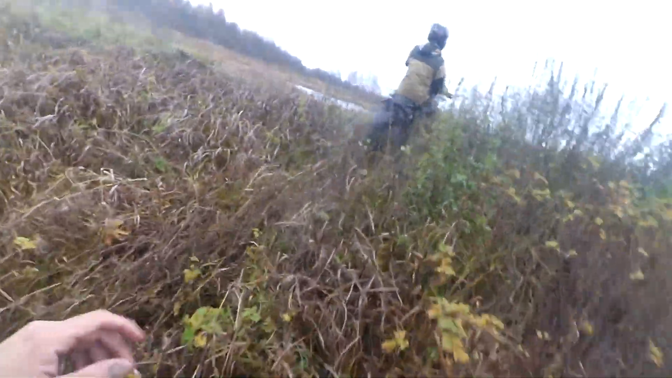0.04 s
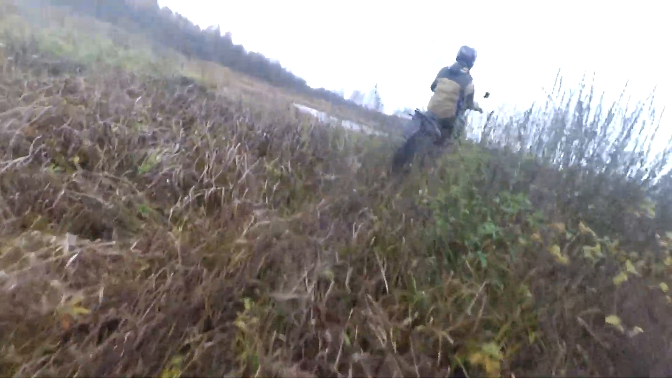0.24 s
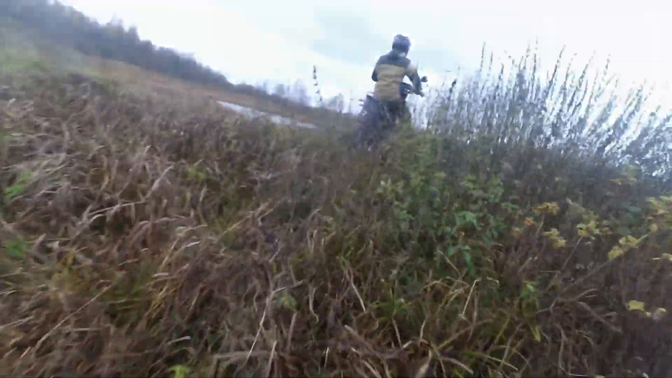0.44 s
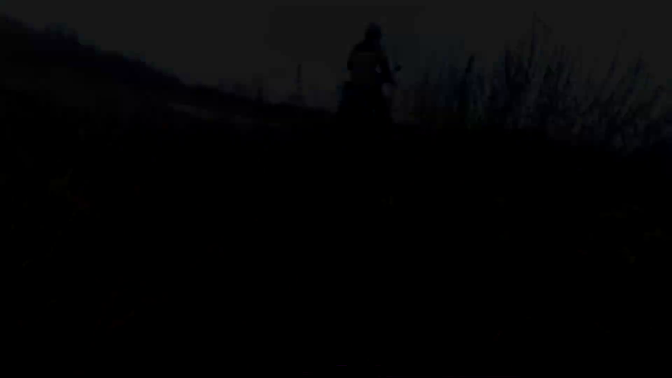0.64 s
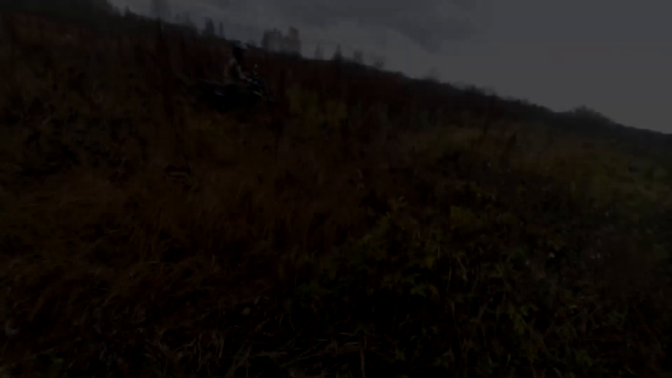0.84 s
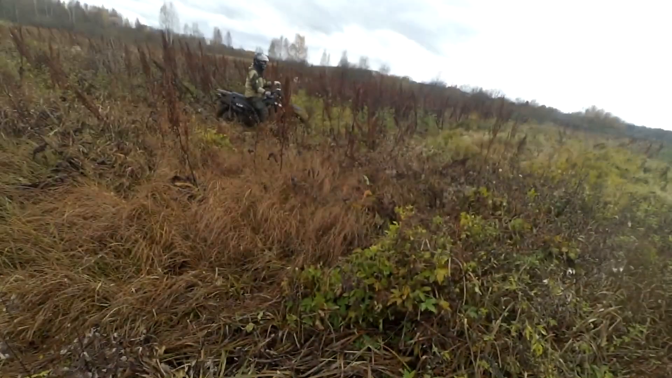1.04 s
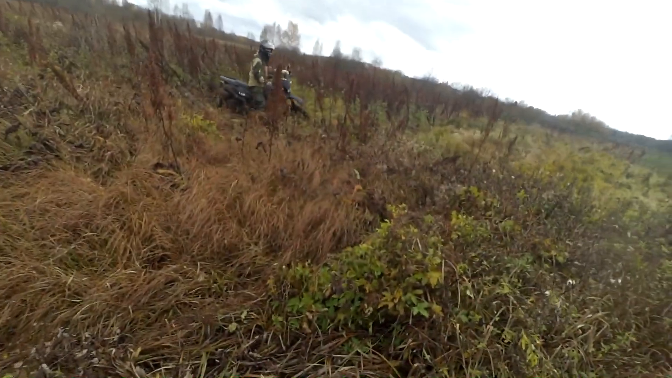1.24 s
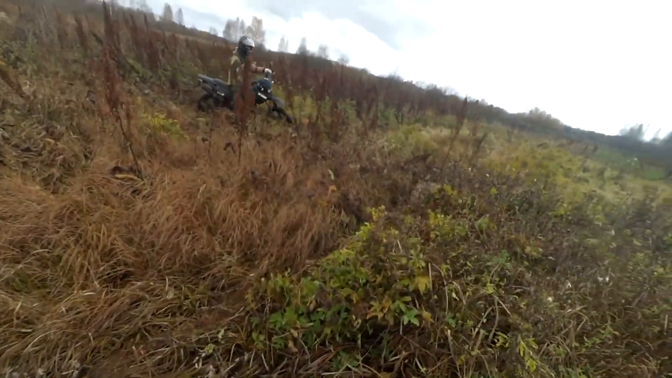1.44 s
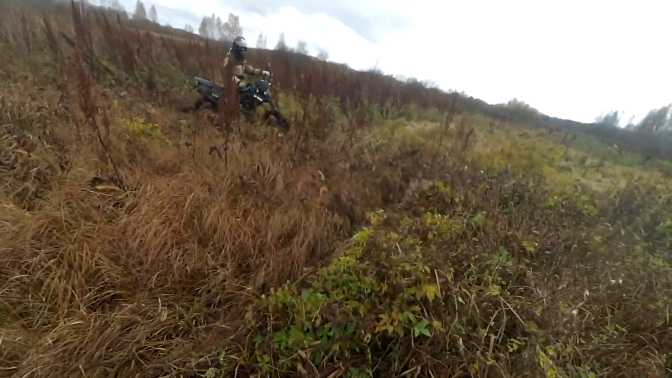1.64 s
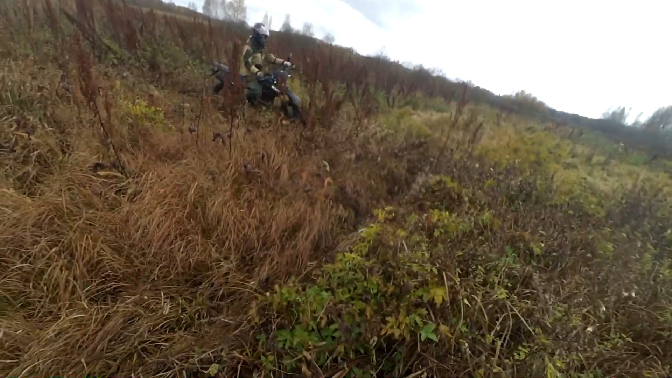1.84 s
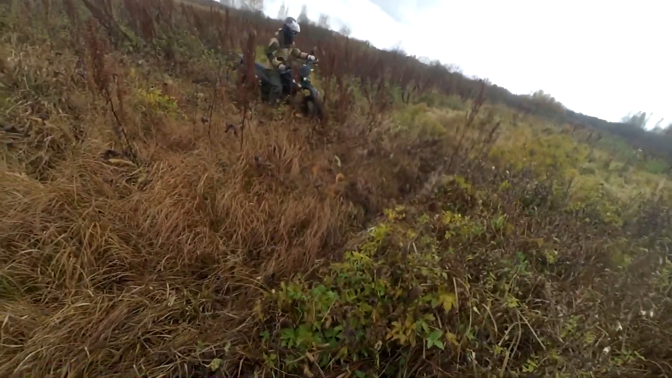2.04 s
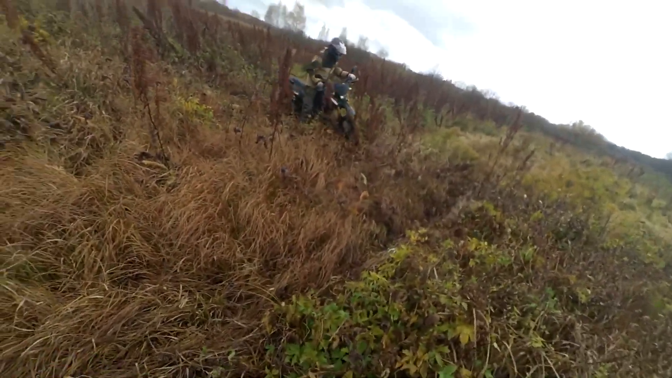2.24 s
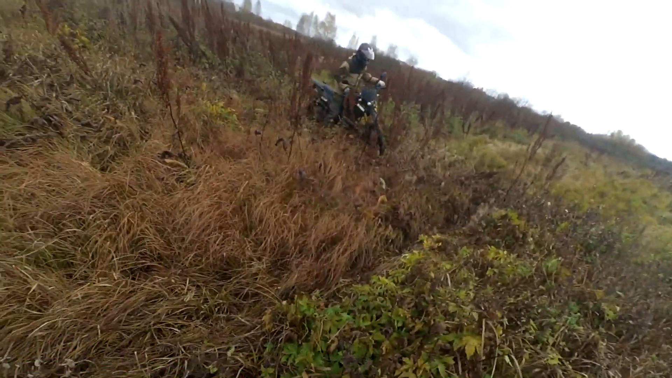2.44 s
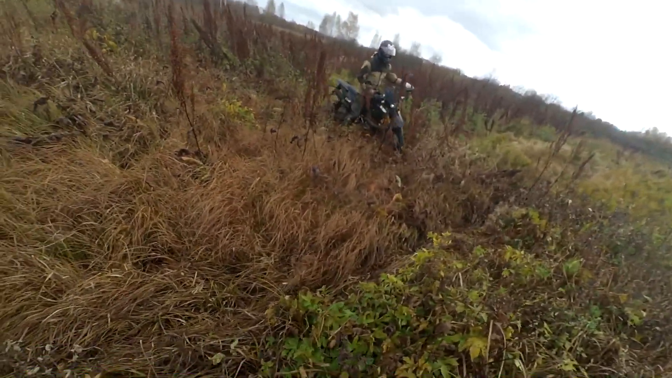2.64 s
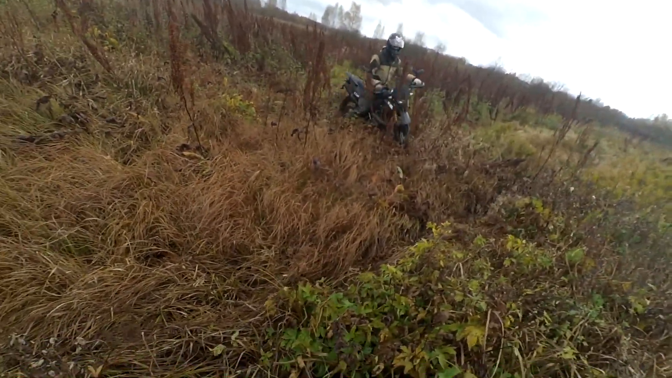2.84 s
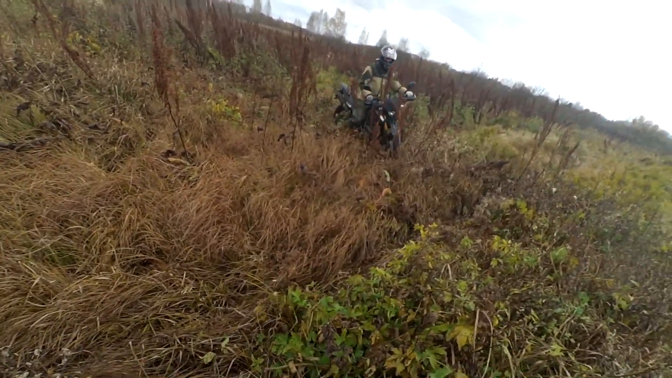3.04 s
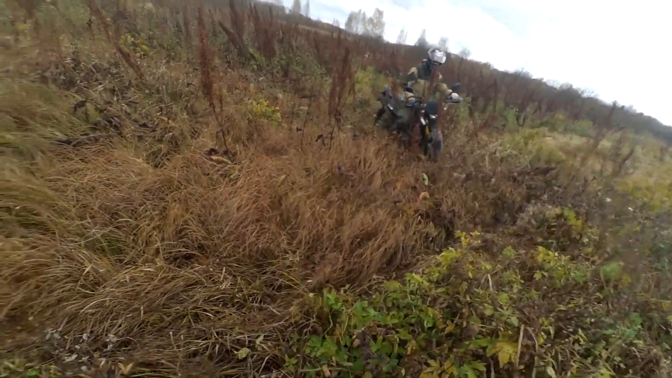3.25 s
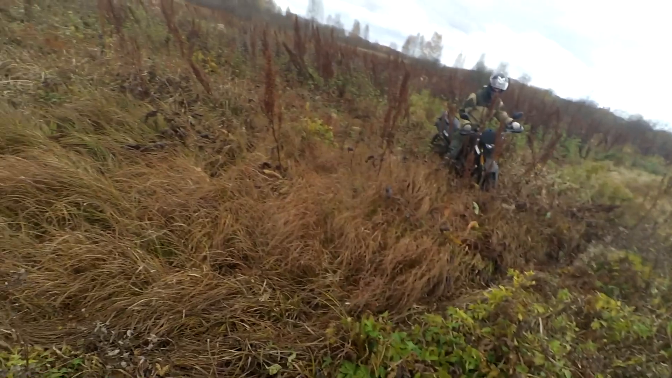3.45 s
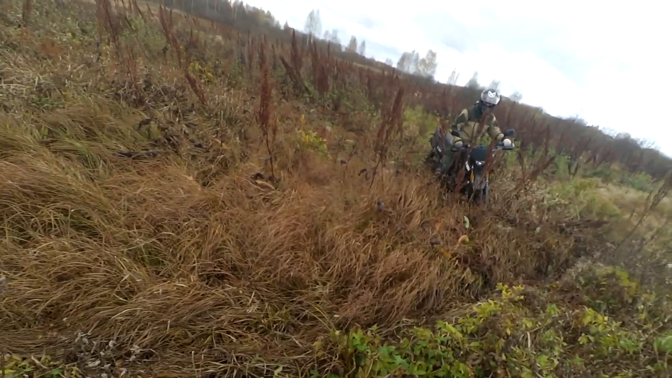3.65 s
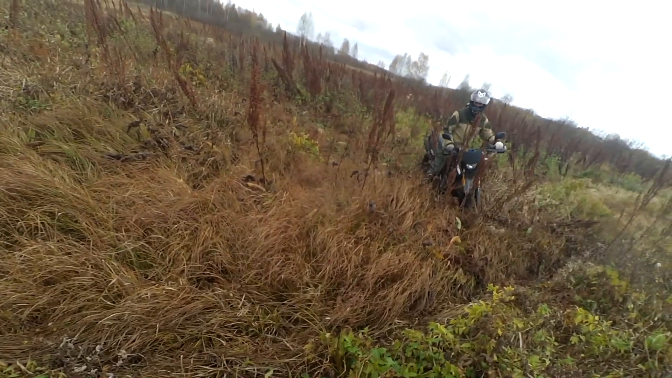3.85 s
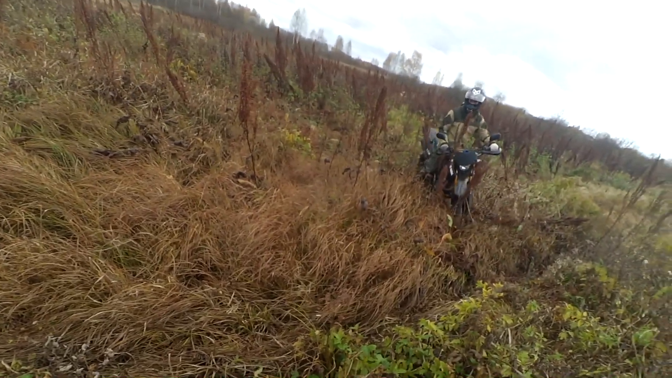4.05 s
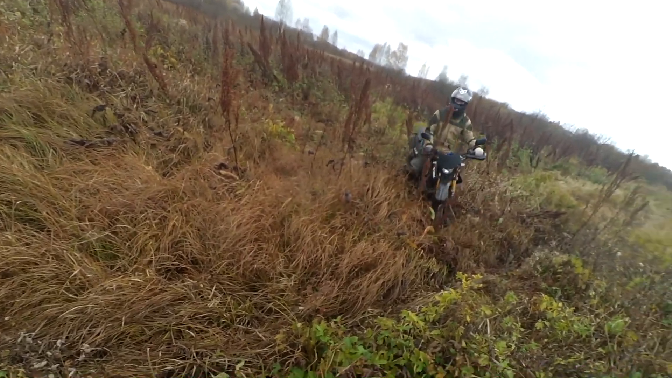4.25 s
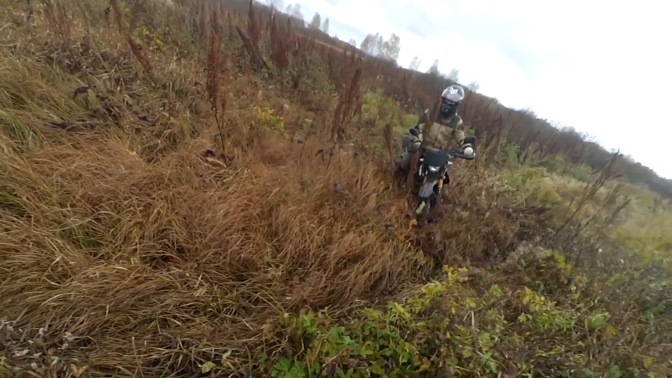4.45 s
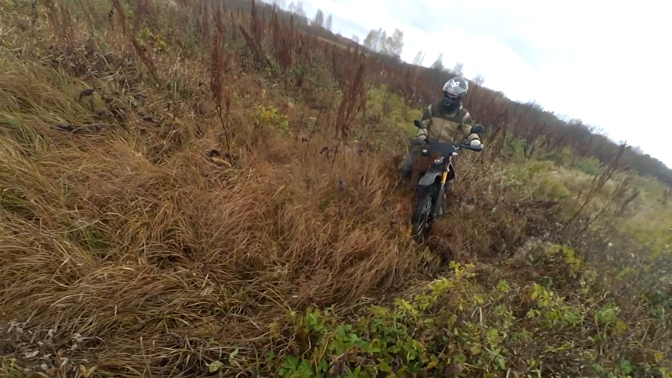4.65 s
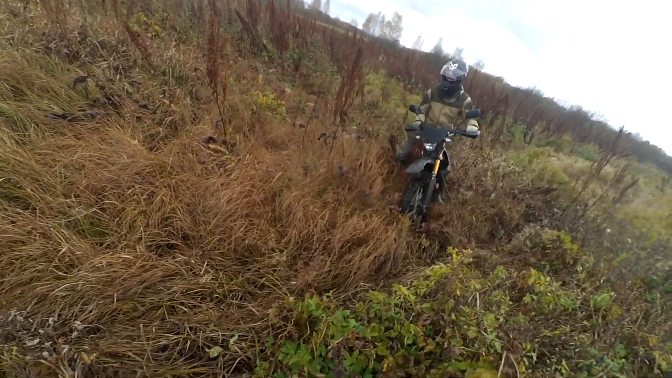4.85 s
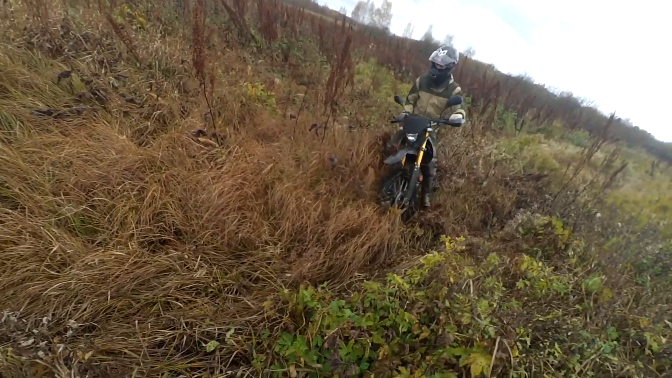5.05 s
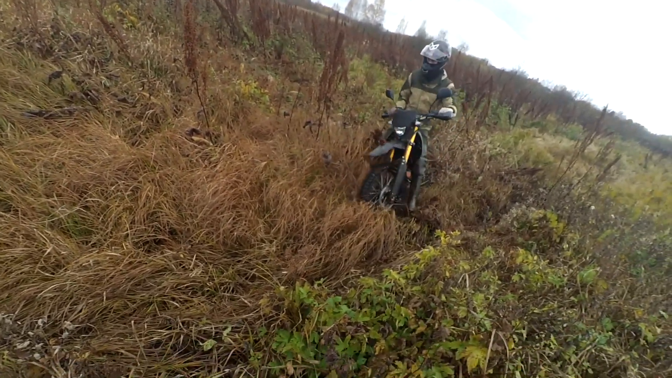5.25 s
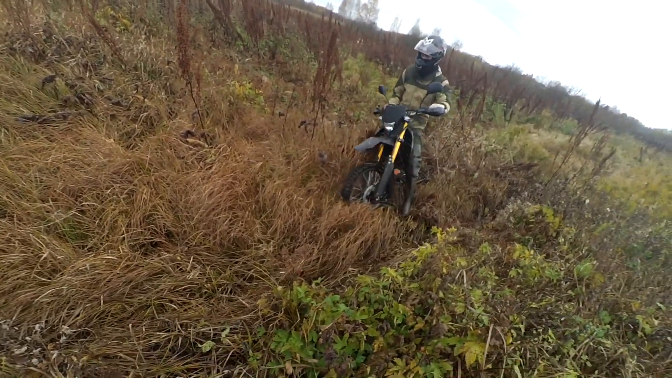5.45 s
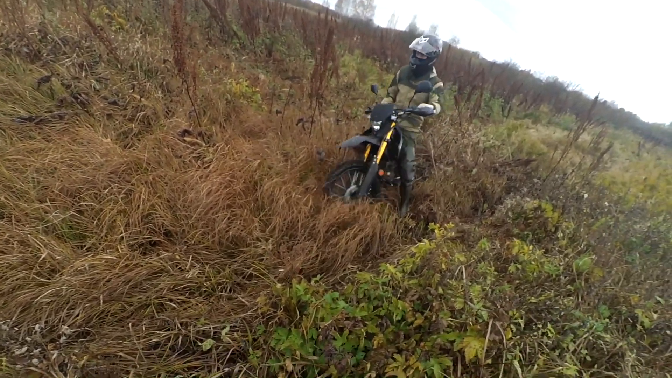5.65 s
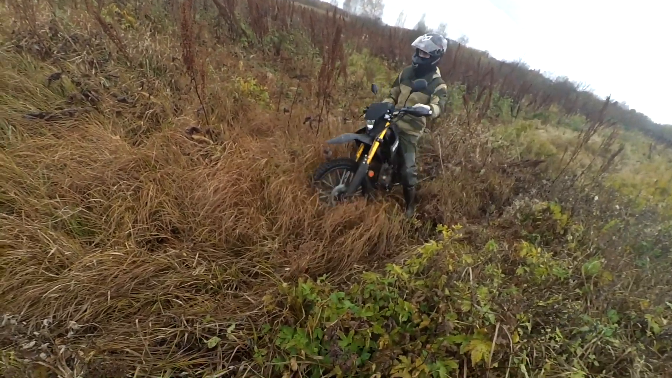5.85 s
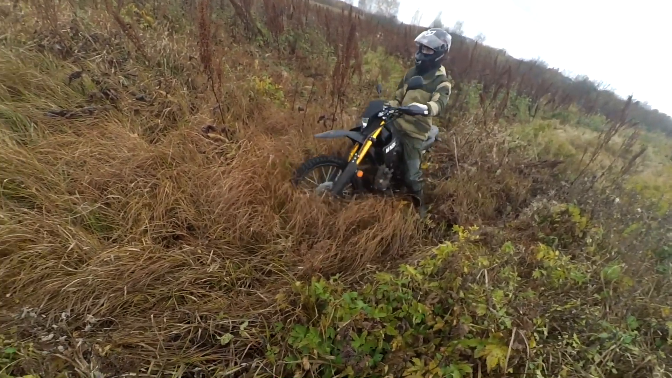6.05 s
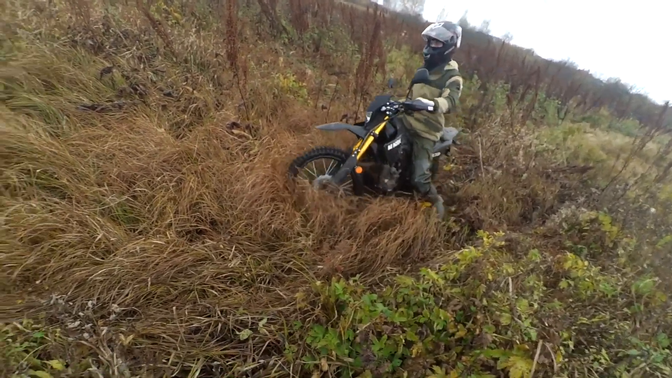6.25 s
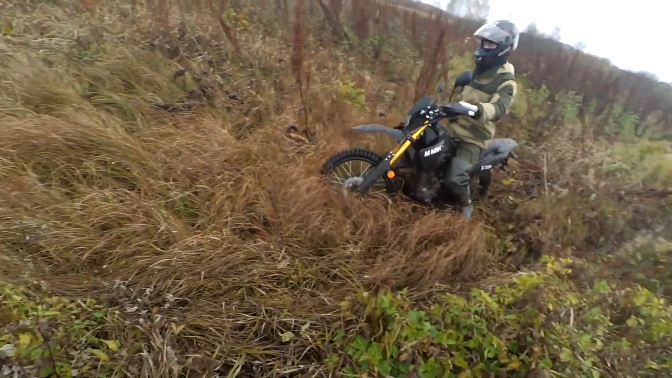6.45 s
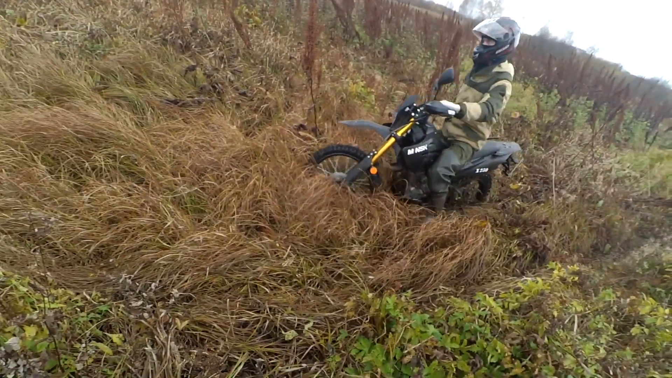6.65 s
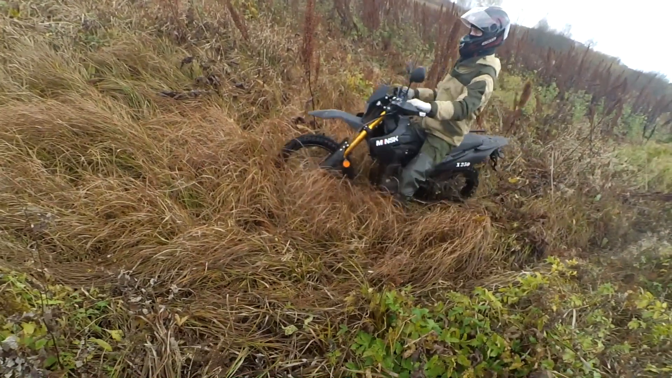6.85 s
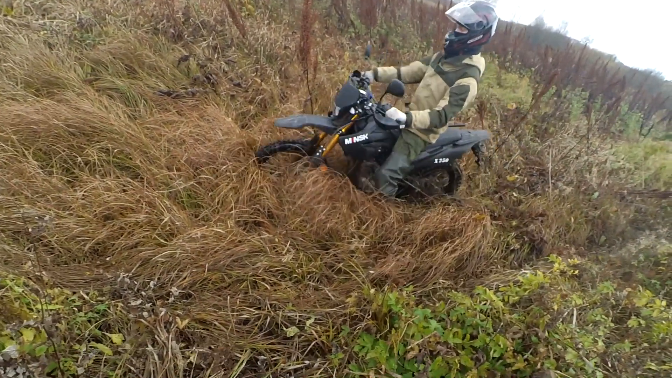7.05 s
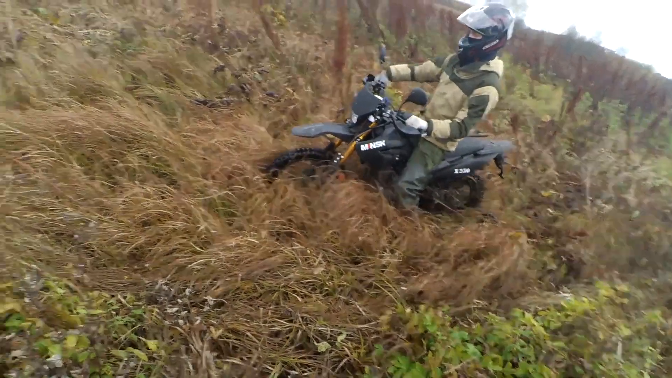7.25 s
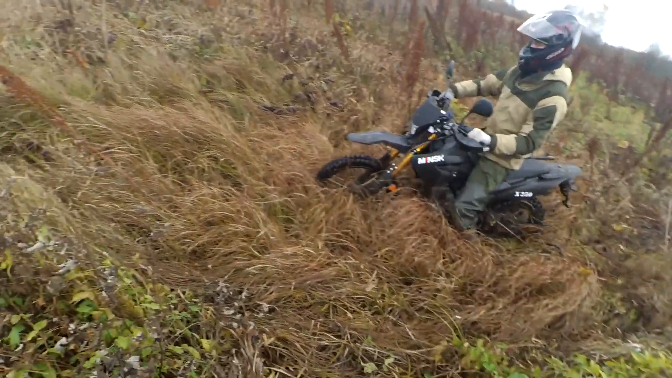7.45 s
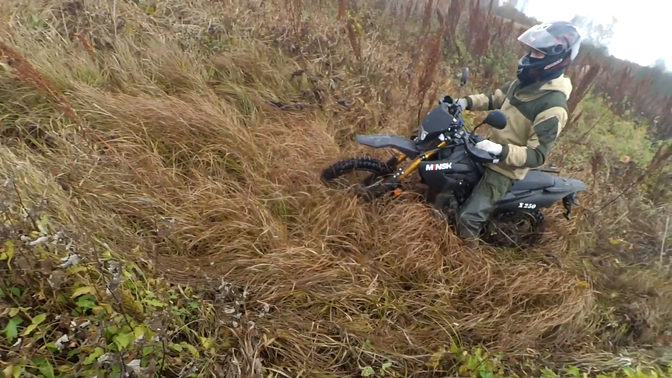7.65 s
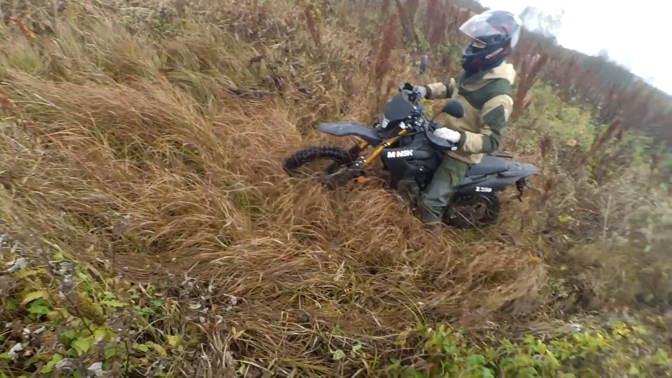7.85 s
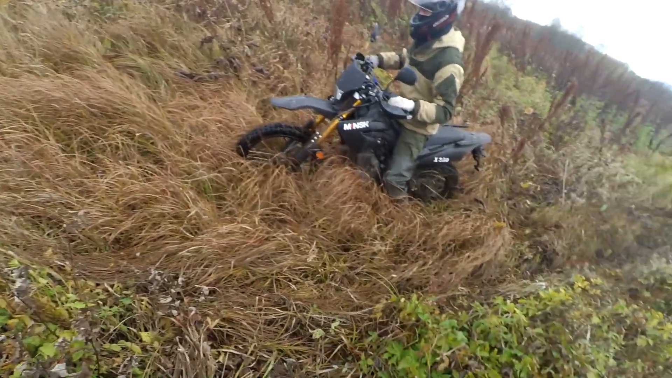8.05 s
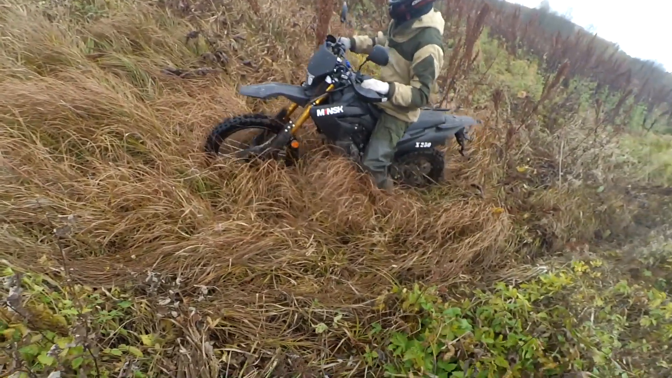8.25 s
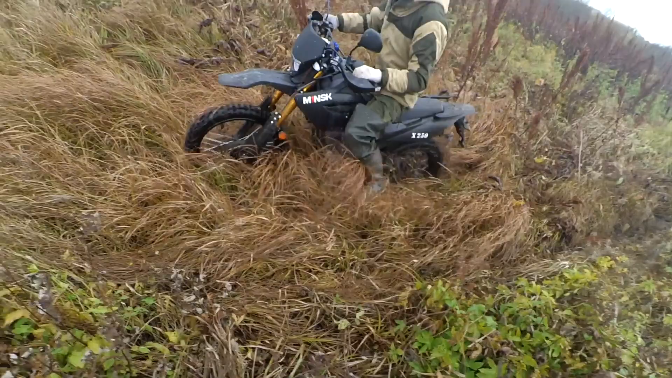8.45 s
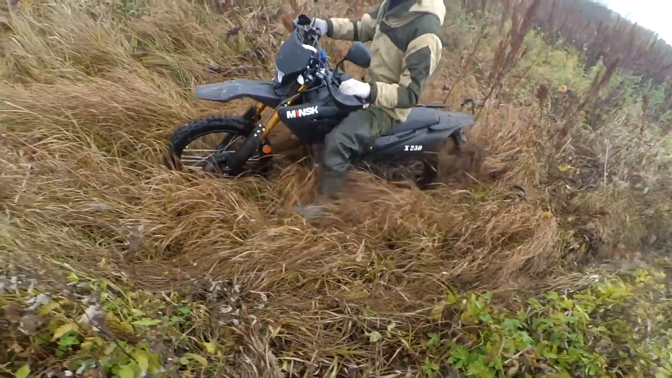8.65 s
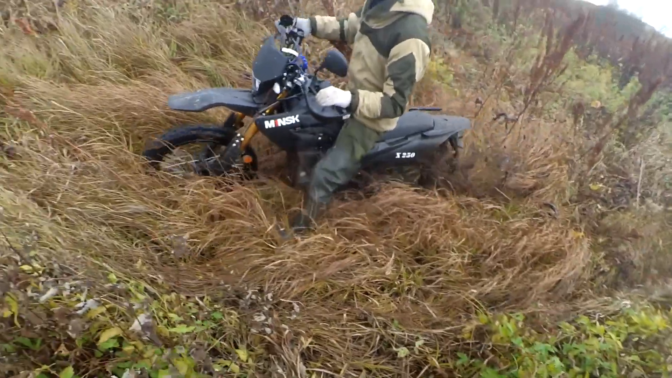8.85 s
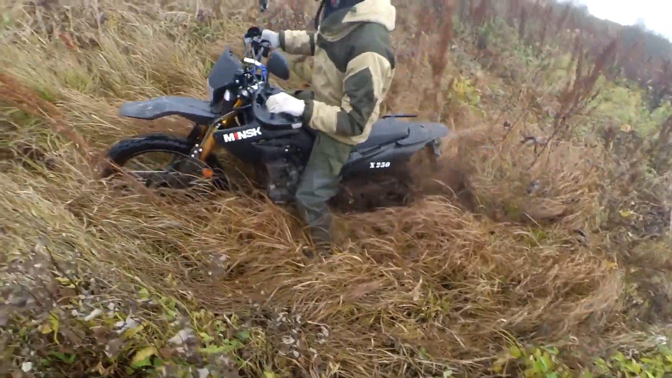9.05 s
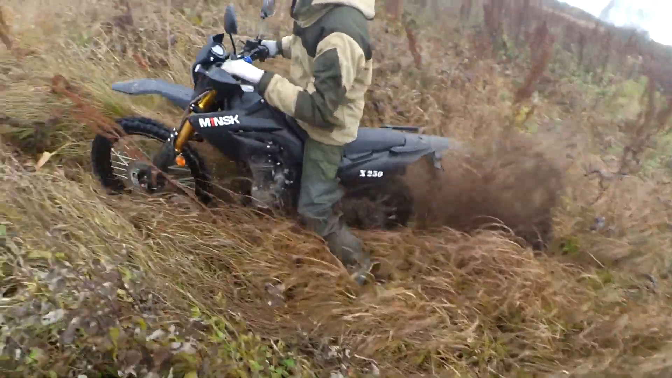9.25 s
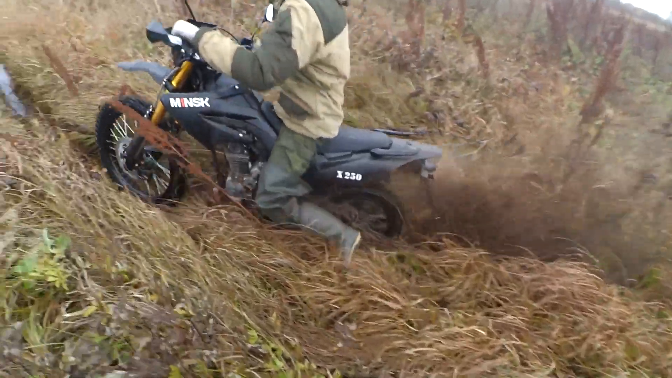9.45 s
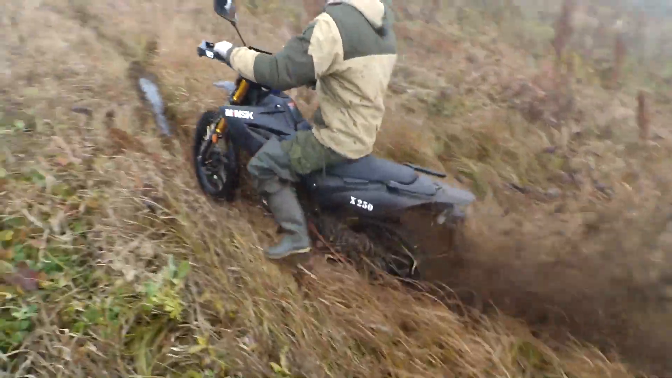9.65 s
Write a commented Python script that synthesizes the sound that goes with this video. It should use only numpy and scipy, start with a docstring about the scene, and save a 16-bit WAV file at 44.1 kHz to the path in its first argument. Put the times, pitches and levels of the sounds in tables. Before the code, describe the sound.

A single-cylinder four-stroke dirt bike rides through wet, hissing grass outdoors, with low wind rumble on the microphone. In the first second it pulls away, accompanied by a few dull knocks. From about 1 second it is quieter and farther off, putting at low revs that rise and fall with the throttle. The engine sags almost to idle around 3 seconds, picks up near 3.7 and sags again around 5.3. Short clusters of exhaust pops come near 2.8, 4.8 and 7 seconds as the throttle shuts. Stalks snap near the microphone, most clearly around 2.6, between 4.3 and 4.8, and at 7 seconds. Wind gusts return from about 6 seconds. At 7.7 seconds the engine revs up sharply and grows louder, with ringing metal and valve clatter. It is close and loudest from 9 seconds to the end near 9.7, with strong grass hiss.

```python
"""A single-cylinder four-stroke dirt bike rides off through wet, hissing grass; wind rumbles on the
microphone and a few dull knocks sound. Each firing drives the resonances of the exhaust pipe and the
engine's metal. While the bike is far off, stalks snap near the microphone, and near 2.8, 4.8 and 7 s
the throttle shuts and unburnt gas pops in the pipe. From 7.7 s it revs up and is at last close by."""
import sys
import numpy as np
from scipy import signal
from scipy.io import wavfile
from scipy.ndimage import uniform_filter1d

SR = 44100
rng = np.random.default_rng(int(sys.argv[2]) if len(sys.argv) > 2 else 0)


def transcribe(signal):
    """Save signal, clipped to [-1, 1], as a 16-bit WAV file at the path in sys.argv[1]."""
    frames = np.atleast_2d(signal).T
    limited = np.clip(frames, -1, 1)
    pcm = np.round(limited * 32767).astype(np.int16)
    wavfile.write(sys.argv[1], SR, pcm)


N = 427769
FIRING_PHASE = .56   # share of the cycle at which a firing strikes

# exhaust pipe resonances: (frequency [Hz], bandwidth [Hz], gain [dB])
PIPE_MODES = [(100, 68.6, 2.5), (206, 94, -0.5), (247.7, 54.3, 0.5), (369.5, 26, -5), (424.3, 49.4, -5.5)]
# throttle and distance: (time [s], exhaust level [dB], throttle shut [0-1], upper harmonics' gain [dB])
RIDE = [(0, -23.5, 0.14, 8.5), (0.15, -25, 0.16, 1), (0.33, -35.5, 0.02, 19), (0.4, -23, 0.81, -3.5),
        (0.8, -30.5, 0.36, -4.5), (1.1, -34, 0.9, 2), (1.3, -33, 0.59, 2), (1.7, -32, 0.49, -2),
        (1.85, -36.5, 1, 2), (2.1, -32.5, 0.42, -2.4), (2.4, -32.5, 0.56, -2.5), (2.72, -33.1, 0.32, -3.5),
        (2.8, -35, 1.0, -3.5), (3.05, -35.7, 0.97, 6), (3.35, -35, 0.82, 0.8), (3.5, -31.5, 0.27, 3),
        (3.8, -27.1, 0.54, -6), (4.1, -32, 0.1, -1.4), (4.7, -30.5, 0.19, 0.5), (4.82, -34.5, 0.83, 1.8),
        (5.25, -32.5, 0.6, 4.5), (5.6, -34, 0.37, 5.5), (6.1, -32.5, 0.1, 4.5), (6.5, -30, 0.45, 2.5),
        (6.97, -29.5, 0.55, 5), (7.07, -36, 0.9, 5.5), (7.3, -31.6, 0.97, -3.5), (7.6, -31.5, 0.58, 2),
        (7.7, -22.5, 0, 3.5), (7.76, -22, 0.1, 2.5), (7.8, -22.5, 0.73, -10.5), (7.88, -25, 0.66, -6),
        (7.92, -24.5, 0.25, 0), (8.3, -23, 0.35, 2.1), (8.55, -22.5, 0.12, 0.1), (8.9, -18.5, 0.49, 2),
        (8.98, -18.5, 0.44, 0), (9.03, -19, 0.59, -6.5), (9.2, -19.0, 0.42, 4.5), (9.38, -20.5, 0.29, 6),
        (9.5, -20, 0.46, 2.5), (9.7, -15.5, 0.4, 5.0)]
# wind on the microphone: (time [s], level [dB])
WIND_LEVELS = [(0, -24), (.8, -30), (.82, -43), (1.2, -43), (2.4, -39), (4.7, -35), (5.55, -51), (6, -31.5),
               (7, -28), (7.55, -31), (7.75, -41), (8.2, -30), (9, -24), (9.6, -31)]


def amp(db):
    """Amplitude ratio of a level in decibels."""
    return 10 ** (np.asarray(db) / 20)


def unit_rms(x):
    """Normalisation to an rms of 1."""
    return x / np.sqrt(np.mean(x ** 2) + 1e-20)


def curves(rows):
    """Linear interpolation of each column over time, sample by sample."""
    times, *columns = np.transpose(rows)
    return [np.interp(np.arange(N) / SR, times, column) for column in columns]


def drift(rate_hz):
    """Slow random modulation: low-passed noise of unit rms."""
    hop = 40
    pole = np.exp(-2 * np.pi * hop * rate_hz / SR)
    slow = signal.lfilter([1], [1, -2 * pole, pole ** 2], rng.standard_normal(N // hop + 2002))[2000:]
    return np.interp(np.arange(N) / hop, np.arange(len(slow)), unit_rms(slow))


def resonate(x, modes):
    """Superposition of damped modes (frequency [Hz], bandwidth [Hz], gain [dB]), alternating in sign."""
    out = 0
    for k, (hz, width, db) in enumerate(modes):
        r = np.exp(-np.pi * width / SR)
        b = (1 - r * r) / 2 * np.array([1, 0, -1])
        a = [1, -2 * r * np.cos(2 * np.pi * hz / SR), r * r]
        out = out + (-1) ** k * amp(db) * signal.lfilter(b, a, x + 1e-18)
    return out


def band(x, low_hz, high_hz, order=2):
    """Butterworth band-pass filtering."""
    return signal.sosfilt(signal.butter(order, [low_hz, high_hz], "band", fs=SR, output="sos"), x)


def puff(cycles, decay, floor):
    """Exponential decay above a floor, restarted each cycle; the time constant is in cycles."""
    return floor + np.exp(-(cycles % 1) / decay)


def wind():
    """Turbulent pressure on the microphone: a low rumble that swells in gusts."""
    level_db, = curves(WIND_LEVELS)
    buffeting = band(rng.standard_normal(N + SR), 5.1, 16.1)[SR:]
    rumble = .053 * band(rng.standard_normal(N), 68, 139, order=1)
    return amp(level_db) * unit_rms((buffeting + rumble) * amp(3.6 * drift(.55)))


def grass():
    """Superposition of countless small sounds: a dense rustle with ticks of uneven size."""
    # spectral peaks of the hiss: (frequency [Hz], bandwidth [Hz], gain [dB])
    colour = [(5230, 1170, -4), (7080, 415, 2.5), (8180, 1400, -4.5), (12100, 2200, -8), (16000, 2500, -10)]
    # grass hiss: (time [s], level [dB])
    levels = [(0, -47), (.35, -48), (.5, -54.5), (.62, -49), (.8, -61), (1.1, -56.5), (1.35, -48),
              (1.65, -55.5), (2.05, -53.5), (2.42, -60.5), (3.6, -59.5), (4.2, -55.5), (4.6, -49),
              (5.4, -58.5), (5.94, -52.5), (7, -52), (7.62, -60), (7.94, -52.5), (8.4, -48), (9.15, -40.5),
              (9.7, -44.5)]
    level_db, = curves(levels)
    onsets = rng.random(N) < 1500 / SR
    ticks = onsets * amp(3.2 * np.minimum(rng.exponential(1, N), 5)) * rng.standard_normal(N)
    rustle = (rng.standard_normal(N) + .5 * unit_rms(ticks)) * amp(1.14 * drift(7.2))
    return amp(level_db) * unit_rms(band(resonate(rustle, colour), 2800, 17000))


def stalk_snaps():
    """Fracture transients: each stalk gives a noise burst with an abrupt rise and exponential decay."""
    # breaking stalks: (time [s], relative level [dB], time to decay by 60 dB [s])
    snaps = [(0.7377, -41, 0.03), (0.8046, -43, 0.018), (1.9804, -34, 0.071), (2.606, -22.5, 0.024),
             (2.6653, -25.5, 0.023), (3.3156, -34, 0.031), (3.3744, -39, 0.04), (3.6174, -37, 0.04),
             (3.7998, -36, 0.044), (3.8915, -36, 0.04), (4.181, -32, 0.054), (4.2727, -33, 0.049),
             (4.3091, -22.5, 0.025), (4.4654, -28, 0.046), (4.488, -25, 0.04), (4.803, -23, 0.054),
             (5.0345, -34.5, 0.046), (5.255, -35, 0.04), (5.404, -35.5, 0.044), (5.6566, -33, 0.04),
             (7.015, -21.5, 0.028), (7.5687, -56, 0.04), (7.6066, -57.5, 0.04), (8.3774, -37, 0.04)]
    # broad resonances of a snap: (frequency [Hz], bandwidth [Hz], gain [dB])
    modes = [(1000, 410, -7.5), (3560, 750, -3.5), (5500, 770, -2.5), (7740, 1100, 0), (12800, 2100, -9.5)]
    envelope, t = np.zeros(N), np.arange(4000) / SR
    for time, db, t60 in snaps:
        start = round(time * SR)
        decay = amp(-60 * t / t60) + .71 * amp(-60 * t / .025)
        envelope[start:start + len(t)] += amp(db) * decay * np.minimum(t / .00017, 1)
    return amp(-4.5) * resonate(envelope * rng.standard_normal(N), modes)


def dull_knocks():
    """Free decay of damped modes: short dull knocks; the one near 3.4 s is a brief bark of the engine."""
    # short dull sounds: (time [s], relative level [dB], upper modes against lower [dB])
    knocks = [(0.283, -25.5, -14), (0.544, -25, -4), (0.692, -35, -13), (0.767, -46.5, 19),
              (0.849, -34.5, -26), (3.388, -39.5, 8)]
    low, high = np.zeros((2, N))
    for time, db, upper_db in knocks:
        low[round(time * SR)] = amp(db)
        high[round(time * SR)] = amp(db + upper_db)
    ringing = resonate(low, [(283, 20, .14), (368, 31, -.97)])
    ringing += resonate(high, [(537, 34, -7.5), (820, 180, -10)])
    soft_pulse = np.hanning(round(.0017 * SR))
    return amp(20) * np.convolve(ringing, soft_pulse)[:N]


def firing_rate():
    """Fundamental frequency in Hz: one firing for every two turns of the crank."""
    # engine speed: (time [s], firing rate [Hz])
    speeds = [(0.0, 35.6), (0.12, 31.3), (0.2, 32.0), (0.38, 39.2), (0.7, 30.5), (0.85, 30.5), (1.1, 23.7),
              (1.5, 30.3), (1.7, 30.8), (1.8, 25.8), (1.92, 24.0), (2.0, 27.16), (2.2, 34.93), (2.4, 36.59),
              (2.7, 33.71), (2.8, 30.0), (2.9, 23.6), (3.02, 19.4), (3.1, 21.6), (3.2, 27.4), (3.28, 28.1),
              (3.4, 25.22), (3.6, 35.47), (3.75, 39.61), (4.0, 34.92), (4.3, 31.83), (4.5, 34.52),
              (4.68, 35.37), (4.8, 32.78), (4.9, 26.6), (5.0, 26.7), (5.25, 23.01), (5.4, 23.32),
              (5.7, 27.78), (6.0, 31.13), (6.4, 32.69), (6.8, 32.18), (7.0, 33.29), (7.2, 30.3),
              (7.35, 28.49), (7.62, 25.8), (7.7, 33.0), (7.8, 42.4), (7.9, 43.51), (8.02, 48.95),
              (8.2, 48.34), (8.4, 44.91), (8.52, 41.59), (8.7, 47.34), (8.9, 50.77), (8.95, 49.69),
              (9.0, 46.65), (9.1, 45.43), (9.2, 45.78), (9.3, 48.89), (9.38, 48.61), (9.55, 44.82),
              (9.7, 42.92)]
    return curves(speeds)[0]


def throttle_shut():
    """Throttling of the intake, from 0 (open) to 1 (shut)."""
    return curves(RIDE)[1]


def coasting():
    """Unloading of the engine: 0 while it pulls, 1 with the throttle well shut."""
    return np.interp(throttle_shut(), [.3, .7], [0, 1])


def thin_rings():
    """Narrow-band resonance: single modes of the engine's metal, driven by noise, swell and fade."""
    # passing rings: (time [s], duration [s], frequency [Hz], bandwidth [Hz], level [dB])
    rings = [(.9, 1.6, 4250, 230, -62.5), (3.195, 1.2, 1875, 46, -62.5), (3.298, 1.9, 625, 60, -55.5),
             (4.85, 0.89, 893.6, 10, -51), (6.3, 0.9, 2770, 27, -59), (7.68, .5, 5350, 120, -56),
             (7.9, 0.83, 3230, 36, -54)]
    out, t = 0, np.arange(N) / SR
    for start, duration, hz, width, db in rings:
        progress = np.clip((t - start) / duration, 0, 1)
        swell = np.sqrt(np.sin(np.pi * progress).clip(0))
        out = out + amp(db) * swell * unit_rms(resonate(rng.standard_normal(N), [(hz, width, 0)]))
    return out


def clatter(cycles, modes, low_hz, high_hz):
    """Forced vibration: valve gear ticks twice a cycle over steady noise; each mode swells and fades."""
    ticks = rng.standard_normal(N) * puff(2 * cycles, decay=.1, floor=1) * amp(1.2 * drift(20))
    ringing = sum((-1) ** k * amp(2.04 * drift(1.6)) * resonate(ticks, [mode])
                  for k, mode in enumerate(modes))
    return unit_rms(band(ringing, low_hz, high_hz))


def ringing_metal(cycles, strength):
    """Impulse excitation: each firing strikes the engine's metal; rattle sustains the modes between."""
    # modes of the metal: (frequency [Hz], bandwidth [Hz], gain [dB])
    modes = [(658, 113, 6), (750, 40, 12.5), (849.3, 28, 21), (960, 10, 14.5), (1057, 16, 11),
             (1273, 140, 6)]
    # heavily damped bark that opens each blow: (frequency [Hz], bandwidth [Hz], gain [dB])
    bark_mode = [(950, 350, 1)]
    # thin whine while coasting: (frequency [Hz], bandwidth [Hz], gain [dB])
    whine_mode = [(880, 25, 11)]
    rate = firing_rate()
    pull = (1 - coasting()) * (rate - 18) / (52 - 18)   # grows with speed while the throttle is open
    bite = np.clip(.1 + pull, 0, .88)   # the blows' share of the driving power
    blows = np.diff(np.floor(cycles - FIRING_PHASE), prepend=0).clip(0) * strength
    blows /= np.sqrt(rate / SR)   # the same power at any speed
    rattle = unit_rms(rng.standard_normal(N) * puff(cycles - FIRING_PHASE, decay=.98, floor=1))
    ringing = resonate(np.sqrt(bite) * blows + np.sqrt(1 - bite) * rattle, modes)
    bark = resonate(bite * blows, bark_mode)
    whine = resonate(coasting() * rattle, whine_mode)
    return unit_rms(band(ringing + bark + whine, 530, 1520))


def engine_body(cycles, strength):
    """Structure-borne sound, radiated by the cases, the ringing metal and the valve gear."""
    # body vibration: (time [s], metal level [dB], case level [dB], valve gear level [dB])
    levels = [(0, -53, -77, -54), (.4, -56.5, -62, -55.5), (.55, -67, -62, -58), (.7, -64, -71, -56.5),
              (.8, -49, -63, -63), (.815, -68, -75, -65), (1.5, -56, -68, -60), (2, -61, -67, -61),
              (2.3, -55.5, -66, -59), (2.65, -56, -69, -57), (2.8, -58.5, -67, -62.5),
              (3.3, -58.5, -74, -62.5), (3.5, -51, -60, -57.5), (4.2, -56.5, -58, -58.5),
              (4.5, -52, -55, -56.5), (4.77, -52.5, -57.5, -56), (4.85, -56, -59.5, -59.5),
              (5.4, -52, -65, -61), (5.7, -52.5, -61.5, -59.5), (6.35, -48.5, -52.5, -54),
              (6.95, -48, -59, -53.5), (7.07, -54, -70.5, -54.5), (7.62, -53.5, -48, -58),
              (7.69, -40.5, -50.5, -51), (7.87, -44, -52.5, -48), (7.94, -35.5, -47, -44.5),
              (8.3, -30.5, -44.5, -42), (8.45, -35, -50.5, -45.5), (8.88, -29.5, -44.5, -40.5),
              (9.05, -34.5, -44.5, -40.5), (9.38, -30.5, -42, -37.5), (9.53, -35.5, -46, -41.5),
              (9.7, -30.5, -43, -41)]
    # buzzing engine cases: (frequency [Hz], bandwidth [Hz], gain [dB])
    case_modes = [(1558, 77, 3.5), (1831, 58, 3), (2280, 560, -3.5)]
    # valves and chain: (frequency [Hz], bandwidth [Hz], gain [dB])
    valve_modes = [(2460, 40, 4.5), (2812, 136, 8.5), (3078, 86, 8.5), (3303, 123, 6.5), (3593, 204, 7),
                   (4210, 540, 3), (4700, 110, 3)]
    metal_db, case_db, valve_db = curves(levels)
    cases = amp(case_db) * clatter(cycles, case_modes, 1330, 3100)
    metal = amp(metal_db) * ringing_metal(cycles, strength)
    valves = amp(valve_db) * clatter(cycles, valve_modes, 2510, 4570)
    return cases + metal + valves


def pipe_pops():
    """Afterfire: unburnt gas ignites in a pressure pulse, heard directly and as a ring of the pipe."""
    # ignitions: (time [s], relative level [dB])
    pops = [(2.788, -18.5), (2.82, -18), (2.85, -27), (4.819, -20), (4.853, -19.5), (4.926, -21.5),
            (7.046, -16), (7.077, -14), (7.106, -16.5), (7.17, -16.5)]
    impulses = np.zeros(N)
    for time, db in pops:
        impulses[round(time * SR)] = amp(db)
    pressure = np.convolve(impulses, np.hanning(round(.0065 * SR)))[:N]
    return amp(1) * (band(pressure, 30, 600, order=1) + resonate(pressure, [(100, 40, -7)]))


def gas_roar(cycles):
    """Turbulent flow noise puffs through the pipe, louder and duller with the throttle shut."""
    shut = throttle_shut()
    wind_db, = curves(WIND_LEVELS)
    level_db = curves(RIDE)[0] - 18 + 9 * shut
    level_db += .42 * (wind_db - wind_db.mean())   # the roar rises and falls with the wind
    flow = rng.standard_normal(N) * puff(cycles - FIRING_PHASE, decay=.35, floor=.73)
    roar = resonate(flow, PIPE_MODES + [(44.3, 7.5, 3.8)])
    return amp(level_db) * unit_rms(band(roar, 33, 153) + amp(-9 * shut) * band(roar, 156, 490))


def pipe_response(hz):
    """Transfer function of the pipe: the complex sum of its resonances."""
    return sum((-1) ** k * amp(db) / (1 + 1j * (hz - centre ** 2 / hz) / width)
               for k, (centre, width, db) in enumerate(PIPE_MODES))


def harmonic_levels():
    """Spectral envelope by speed, throttle and directivity: dB of harmonics 1, 2, 3, 4, 5-6, 7-9, 10+."""
    # open-throttle spectrum: (firing rate [Hz], relative level of each of the seven groups [dB])
    spectra = [(21.0, -10, 0, -30, -11.5, -14, -15.5, -16.5), (25.7, -3.5, 7, -19.5, -5, -13.5, -12.5, -18),
               (30.0, -1, 0.5, -15, -9.5, -13.5, -11.5, -15.5),
               (33.44, -3.5, -1.5, -13, -9, -13.5, -12.5, -11),
               (36.0, -4, 2, -18.5, -4.5, -9.5, -13.0, -14), (41.8, -14, 4.5, -15, -2.5, -22, -9, -10),
               (41.7, -12, 6, -20, -6.0, -9, -5.5, -19), (46.6, -20, 9.5, -18, -6.5, -15, -3.5, -19),
               (51.6, -18, 7.5, -17.5, -3, -7.5, -6.5, -24)]
    # effect of shutting the throttle: (gain of each of the seven groups [dB])
    shut_gains = [-3.5, -18, 16, 3, 5, -6, -5.5]
    rear_gains = [-1, 3.5, 0, -6.5, -2.5, -5.2, -4.5]   # dB added while heard from behind
    behind = np.arange(N) < .83 * SR
    rates, *groups = np.transpose(spectra)
    level_db, shut, upper_db = curves(RIDE)
    levels = []
    for open_db, shut_db, rear_db in zip(groups, shut_gains, rear_gains):
        voice_db = np.interp(firing_rate(), rates, open_db) + shut_db * shut
        levels.append(level_db + voice_db + uniform_filter1d(rear_db * behind, size=2000))
    return levels[:4] + [db + upper_db for db in levels[4:]]


def exhaust(cycles, strength):
    """Periodic firing gives a harmonic series; pipe resonance shares out the upper harmonics' power."""
    rate, levels = firing_rate(), harmonic_levels()
    out = 0
    # phase lags in periods; when coasting the third harmonic falls back and the cycle becomes one putt
    lags = [-.25, 0, .25 + .2 * coasting(), 0]
    for k, (db, lag) in enumerate(zip(levels[:4], lags), start=1):
        out = out + amp(db) * np.cos(2 * np.pi * (k * cycles - lag))
    for harmonics, group_db in zip((range(5, 7), range(7, 10), range(10, 23)), levels[4:]):
        waves, power = 0, 1e-12
        for k in harmonics:
            response = pipe_response(k * rate) / (1 + (k * rate / 470) ** 6)   # the silencer cuts the top
            even_db = 2.5 * (k % 2 == 0)
            size = np.abs(response) * amp(even_db + 4 * drift(3.17))   # wanders as the bike turns
            phase = np.angle(response) + .65 * drift(3)
            waves = waves - size * np.cos(2 * np.pi * k * (cycles - FIRING_PHASE) + phase)
            power = power + size ** 2
        out = out + strength * amp(group_db + .66) * waves / np.sqrt(power)
    return out * np.sqrt(2)


def scene():
    """Linear superposition of all sources at one microphone."""
    cycles = .34 + np.cumsum(firing_rate()) / SR
    burns = amp(.9 * rng.standard_normal(1000))   # no two firings burn alike
    strength = uniform_filter1d(burns[cycles.astype(int)], size=200)
    bike = exhaust(cycles, strength) + gas_roar(cycles) + pipe_pops() + engine_body(cycles, strength)
    return (bike + grass() + stalk_snaps() + dull_knocks() + thin_rings() + wind())[None]


def record(dry):
    """Band limiting: a steep low-pass filter, 70 dB down from 15950 Hz."""
    return signal.sosfilt(signal.cheby2(14, 70, 15950, fs=SR, output="sos"), dry)


dry = scene()
out = record(dry)
transcribe(out)
```